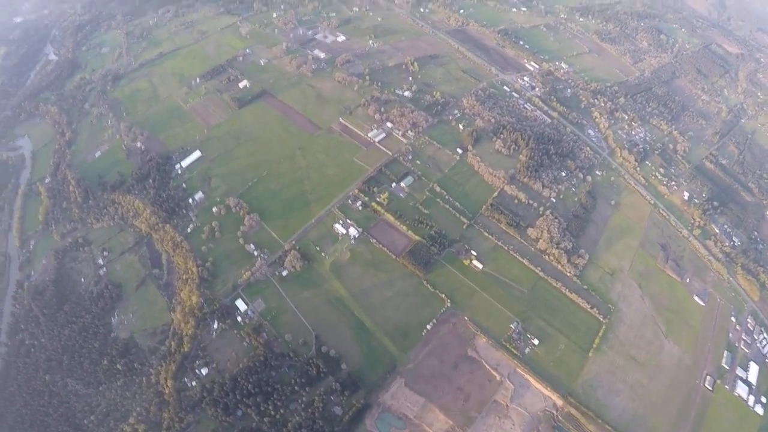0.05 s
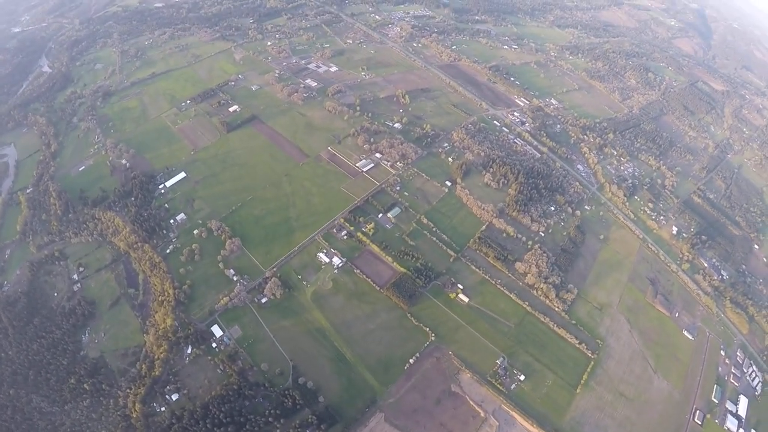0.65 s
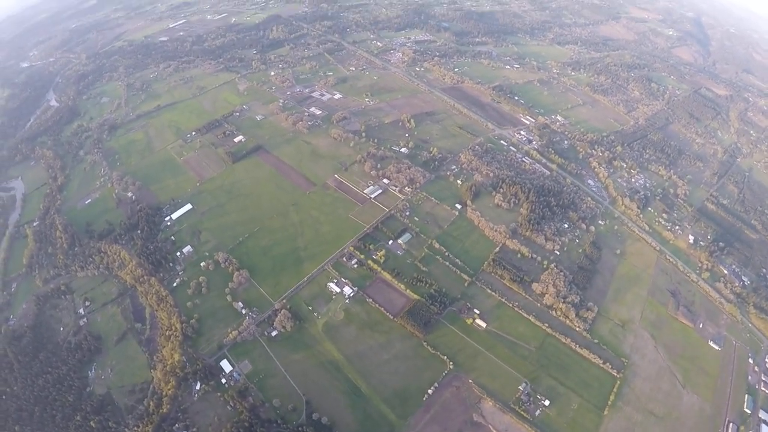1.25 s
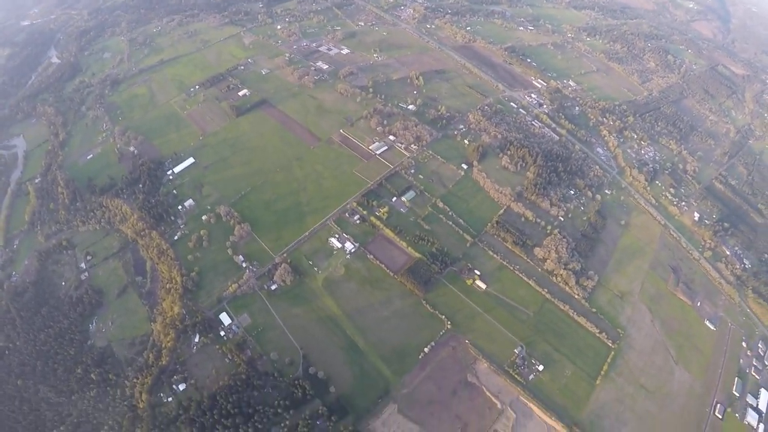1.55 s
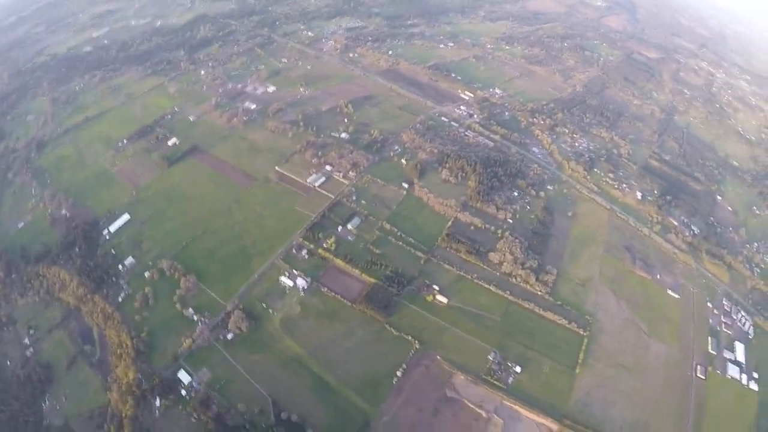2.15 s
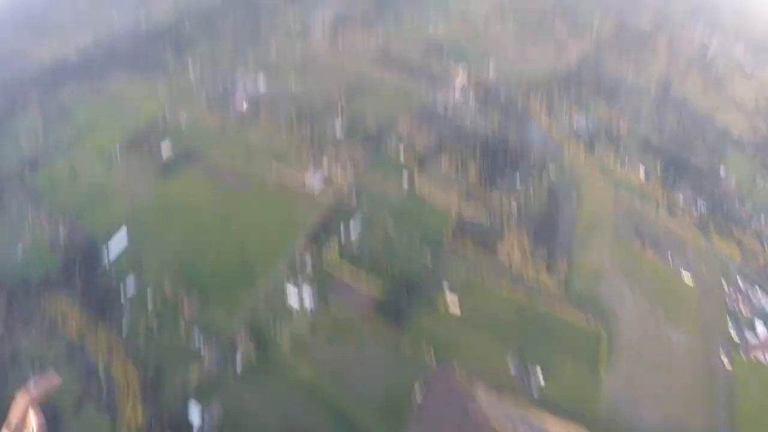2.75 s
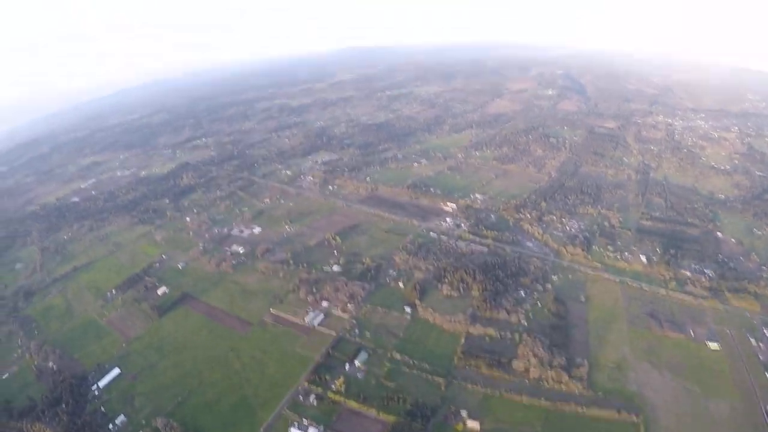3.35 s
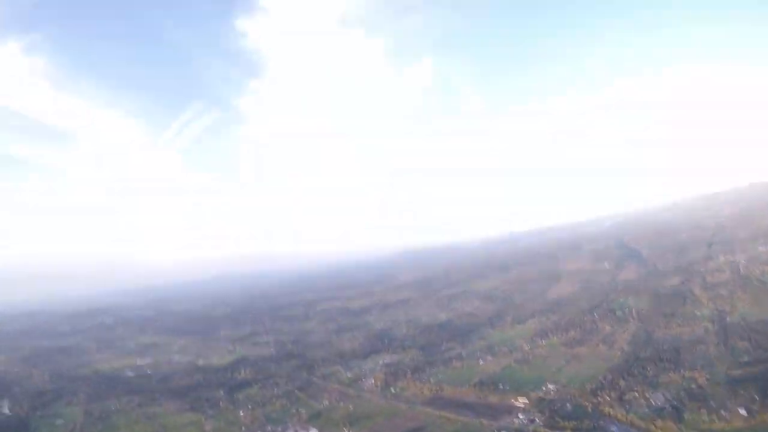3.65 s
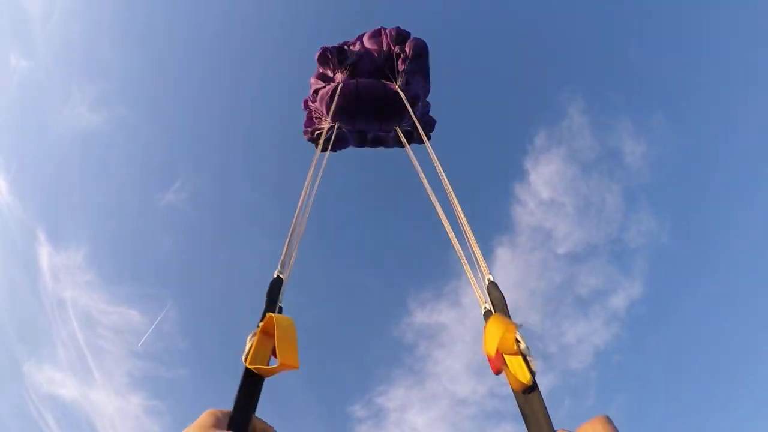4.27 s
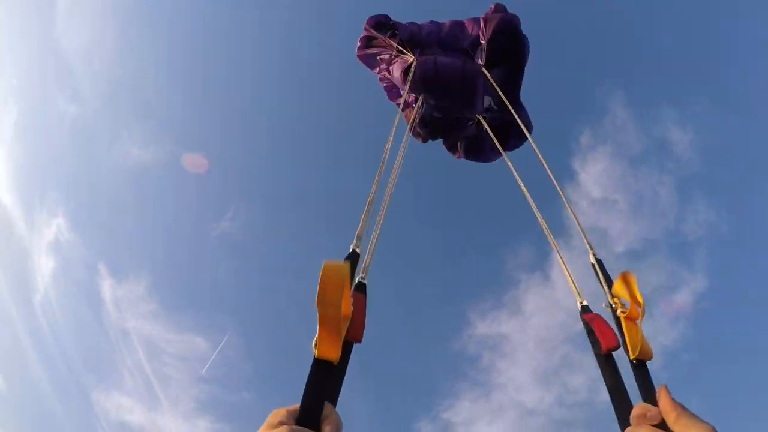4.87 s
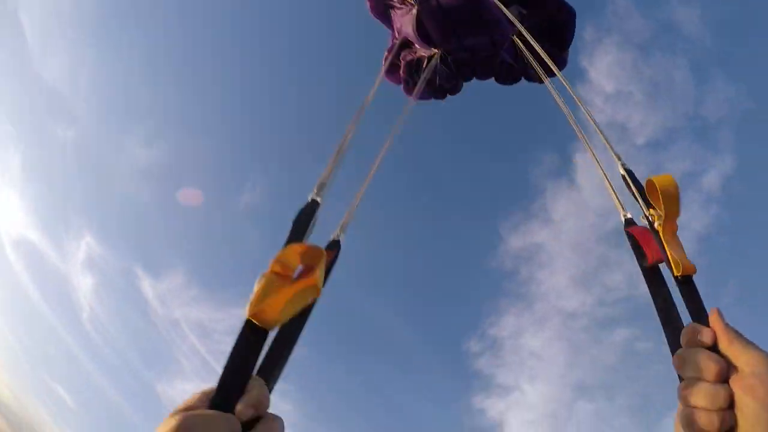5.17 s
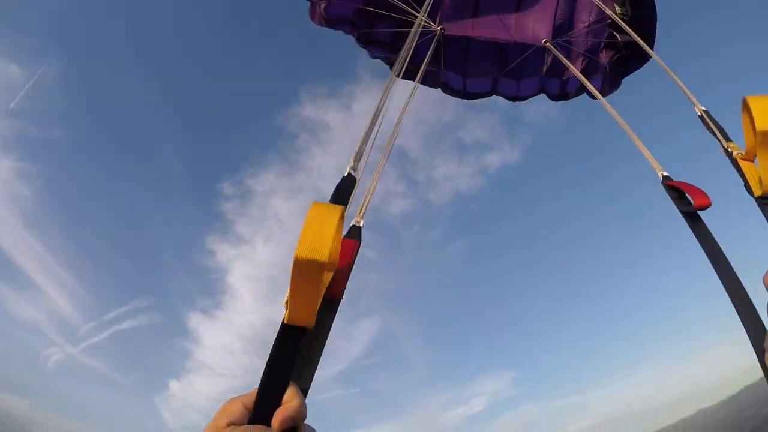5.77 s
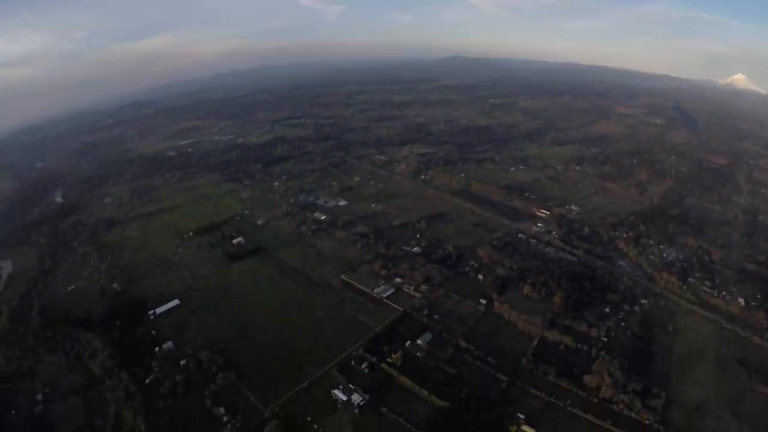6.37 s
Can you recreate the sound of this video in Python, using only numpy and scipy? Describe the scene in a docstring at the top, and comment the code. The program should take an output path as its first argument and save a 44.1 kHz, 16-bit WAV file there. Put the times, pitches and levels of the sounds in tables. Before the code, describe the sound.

Loud wind rushes over a skydiver's helmet microphone in freefall, a deep rumble with a tearing roar, steady hiss and occasional thuds. About halfway through, the parachute starts to open: the hiss drops and the wind breaks into rapid buffets with small, sharp snaps of nylon. These thin out as the fall slows, leaving a softer rumble, a light hiss and a faint swish of fabric sliding down the lines.

```python
"""Freefall wind on a skydiver's helmet microphone: large eddies rumble, smaller ones roar and tear,
the airstream hisses over the case and single vortices thud on the port. At 3.5 s the opening parachute
swings the jumper upright: the hiss drops and the flow breaks into buffets and snaps of nylon. These thin
out as the fall slows, leaving a soft rumble, a light hiss and the slider swishing down the lines."""
import sys
import numpy as np
from scipy import signal
from scipy.fft import rfft, irfft, next_fast_len
from scipy.io import wavfile
from scipy.ndimage import uniform_filter1d, minimum_filter1d

SR = 44100
rng = np.random.default_rng(int(sys.argv[2]) if len(sys.argv) > 2 else 0)


def transcribe(u):
    """Save the signal u as a 16-bit wav file named by the first command-line argument.

    u: samples, shape (n,) or (channels, n), limited to [-1, 1]; the rate is SR.
    q: integer samples, one column per channel.
    """
    v = np.clip(np.atleast_2d(u).T, -1, 1)
    q = np.round(v * 32767).astype(np.int16)
    wavfile.write(sys.argv[1], SR, q)


N = 287525
TIME_S = np.arange(N) / SR

# airspeed: (time [s], share of freefall speed [0-1])
AIRSPEED = [(0, 1), (3.53, 0.99), (3.6, 0.97), (3.85, 0.86), (4.25, 0.49), (4.76, 0.34), (5.15, 0.16),
            (6.5, 0.31)]
# turbulence at the port: (time [s], level [dB])
GUSTS = [(0, 7), (.2, -1), (.45, 5), (1.33, 5), (1.44, -4), (1.7, 3.5), (2.02, 5), (2.24, -5), (2.76, -4.5),
         (3.12, 2), (3.42, -3), (3.75, -5.5), (4.24, -13), (4.7, -10.5), (5.2, -2), (5.42, -7), (6.1, 0),
         (6.25, -19), (6.38, -13)]
# head turns: (centre [s], duration [s], hiss change [dB], rumble change [dB])
TURNS = [(.7, 0.41, 1.5, 2), (1.23, 0.055, -3.5, 3), (1.55, 0.22, 1, 1), (1.9, .12, 0.5, -1),
         (2.033, 0.073, -2, 0.5), (3.28, 0.55, -3.5, -0.5), (3.554, 0.026, -8, 1), (4.7, .4, -1, -0.5),
         (6.305, 0.072, 4.5, -0.5)]
# brief slackening of the flow: (centre [s], half length [s], depth [dB])
FLOW_LULLS = [(1.438, 0.02, 5), (1.481, 0.0093, 7.5), (1.537, 0.018, 5.5), (1.76, 0.02, 2), (2.54, 0.01, 5),
              (3.455, 0.017, 1.5), (3.617, 0.018, 9.5), (3.965, 0.0082, 13), (4.043, 0.01, 4),
              (4.39, 0.012, 8), (4.802, .016, 2), (4.974, 0.019, 5), (5.037, 0.011, 3), (5.203, 0.02, 5.5),
              (5.455, 0.011, 5), (5.59, 0.023, 2), (5.717, 0.011, 3.5), (5.939, 0.022, 6.5),
              (6.027, 0.045, 6.5), (6.222, 0.02, 10), (6.27, 0.018, 1)]
# vortices hitting the port: (time [s], length [s], thud [dB], slap [dB], crack [dB], thump [dB])
VORTEX_HITS = [(1.055, 0.0087, -13, -12, -24, -16), (1.274, 0.019, -17.5, -6, -36, -7),
               (1.517, 0.0057, -13, -15, -40, -10), (1.586, .0083, -12, -17, -36, -20),
               (1.673, 0.012, -24, -14, -32, -19), (1.72, 0.0088, -5, -6.5, -25, -16),
               (2.116, .01, -13, -12, -40, -11), (2.418, 0.013, -12.5, -14, -35, -10.5),
               (2.487, 0.0057, -13, -22, -42, -5.5), (2.522, .01, -7, -22, -33, -6),
               (2.643, 0.014, -11, -15, -40, -10.5), (2.878, 0.023, -16, -14.5, -26, -17),
               (2.915, .009, -12, -10.5, -20, -14), (3.025, 0.0075, -10.5, -24, -28, -20),
               (3.336, 0.011, -12, -7.5, -27, -5), (3.534, 0.03, -17.5, -14.5, -29, -9.5),
               (3.62, 0.0054, -8.5, -12, -38, -8.5), (3.662, 0.0092, -5.5, -16, -28.5, -12),
               (3.817, 0.0043, -20, -27, -26, -28), (3.838, 0.0075, -14, -13.5, -29, -9),
               (3.905, 0.0041, -21, -31, -29, -11), (3.924, 0.011, -14, -20, -29, -6.5),
               (3.99, 0.017, -22, -24.5, -34.5, -6.5), (4.051, 0.0079, -15, -26, -42, -7),
               (4.146, 0.019, -6, -8.5, -27.5, -5), (4.178, 0.0085, -9, -21, -33.5, -20),
               (4.217, 0.014, -28, -26, -41, -11), (4.249, 0.011, -31, -31, -44, -6),
               (4.286, 0.0088, -6, -4.5, -21, -6.5), (4.341, 0.013, -18.5, -14, -31.5, -6),
               (4.368, 0.012, -16, -22, -35, -19), (4.423, .016, -14.5, -15.5, -32.5, -6),
               (4.453, .015, -18, -28, -36, -17), (4.484, 0.012, -30, -36, -53, -27),
               (4.559, 0.017, -9.5, -15.5, -28.5, -5.5), (4.616, 0.0098, -17, -17.5, -43, -7.5),
               (4.655, 0.0086, -12, -19, -35.5, -18), (4.715, 0.02, -5, -10, -24.5, -4),
               (4.746, 0.007, -9, -18, -27, -7), (4.769, 0.017, -17, -18, -30.5, -8),
               (4.792, .0088, -24, -30, -41, -20), (4.819, 0.0072, -27, -28, -46, -16),
               (4.854, 0.012, -9, -19, -35, -10), (4.885, 0.0085, -25, -25, -54.5, -12),
               (4.919, 0.02, -27, -30.5, -55, -36), (4.989, 0.019, -13.5, -20.5, -34.5, -9),
               (5.073, 0.011, -15, -24.5, -44, -11), (5.143, 0.014, -23, -28, -39, -25),
               (5.234, 0.013, -27, -32, -44, -21), (5.331, 0.006, -7.5, -16, -37, -6),
               (5.399, 0.041, -24.5, -36.5, -59, -14), (5.484, 0.014, -13, -29.5, -45, -5.5),
               (5.543, 0.018, -19.5, -29, -50, -19), (5.62, 0.023, -24, -40, -57, -31),
               (5.745, 0.011, -29, -38, -62, -13.5), (5.861, 0.032, -22, -42, -61, -19),
               (6.119, 0.017, -18, -32, -55, -14), (6.33, .025, -14, -28, -43, -8),
               (6.376, 0.05, -22, -32.5, -60, -13)]
# taut nylon snapping: (time [s], level [dB])
NYLON_SNAPS = [(3.58, -28), (3.619, -45), (3.6563, -20.5), (3.8394, -34), (3.902, -42), (3.9188, -24),
               (4.074, -32), (4.1105, -36), (4.137, -33), (4.1476, -21), (4.1815, -37), (4.2432, -45),
               (4.2771, -42), (4.287, -30), (4.335, -35), (4.419, -29.5), (4.549, -41), (4.558, -26),
               (4.5914, -33), (4.617, -36), (4.6511, -42), (4.6941, -36), (4.705, -35), (4.71, -25),
               (4.718, -39), (4.726, -35), (4.746, -37), (4.7634, -41), (4.7705, -35), (4.857, -31.5),
               (4.981, -39), (4.9912, -36), (5.332, -39), (5.481, -43), (6.326, -44)]
# slider slipping down the lines: (centre [s], half length [s], level [dB])
SLIDER_SLIPS = [(5.855, 0.29, -49), (5.85, 0.055, -57), (5.897, 0.014, -42.5), (6.078, 0.017, -41),
                (6.177, 0.034, -50.5), (6.257, 0.052, -59.5), (6.37, 0.069, -46.5), (6.5, .05, -63.5)]

# large, middling and small eddies: (frequency [Hz], relative density [dB])
RUMBLE_SPECTRUM = [(10, -56), (22, -9), (45, -1), (70, -3), (110, -6.5), (150, -11), (260, -33),
                   (600, -78.5)]
ROAR_SPECTRUM = [(70, -8.5), (140, -1), (220, 0.5), (350, -1.5), (510, -4.5), (700, -12), (1000, -47.5),
                 (1600, -37), (4000, -102)]
TEARING_SPECTRUM = [(400, -3.5), (780, 7.5), (1100, 1), (1500, -8), (2100, -12), (3100, -15.5),
                    (3700, -17.5), (5600, -33), (8000, -40), (11000, -44), (13000, -43), (16000, -54)]
# hiss coloured by the case's cavities; dry wind rasp: (frequency [Hz], relative density [dB])
HISS_SPECTRUM = [(700, -6), (1500, -0.5), (2500, -1.5), (3100, 2), (3600, -3.5), (4000, 0), (5600, 0.5),
                 (6500, -6), (8000, -12), (9400, -13.5), (11200, -19), (12400, -13.5), (13300, -12),
                 (15500, -18)]
RASP_SPECTRUM = [(600, -21), (1200, 3.5), (1900, 1.5), (2500, -5), (3050, -0.5), (3700, -6), (7000, -55)]
# a buffet's deep body, slap and crack ringing in the port: (frequency [Hz], relative density [dB])
THUD_SPECTRUM = [(30, -19.5), (65, -8.5), (110, 0.5), (185, 1.5), (270, -4.5), (350, -10), (600, -54),
                 (2000, -115)]
SLAP_SPECTRUM = [(200, -26), (320, 0.5), (420, 1), (560, -2), (700, -8.5), (1000, -20), (1600, -45),
                 (4000, -97)]
CRACK_SPECTRUM = [(350, -25), (720, 7.5), (1200, 5), (1550, 1), (1950, 0), (2400, -6), (3100, -5),
                  (3900, -15), (5600, -16.5), (8000, -30), (11000, -41), (13000, -41), (16000, -47)]
# snapping and sliding nylon: (frequency [Hz], relative density [dB])
SNAP_SPECTRUM = [(700, -20), (1400, 15), (2400, -11), (3100, -2), (3900, 0), (5600, -2.5), (8000, -16),
                 (11000, -20), (13000, -22), (15500, -26)]
SLIDE_SPECTRUM = [(900, 8.5), (1900, -14), (2400, -4), (3050, 5.5), (4300, -3.5), (5700, -0.5), (6500, -6),
                  (8000, -16.5), (11000, -22.5), (12800, -18), (15500, -30)]


def from_db(db):
    return 10 ** (np.asarray(db) / 20)


def unit_rms(x):
    return x / np.sqrt(np.mean(x ** 2) + 1e-20)


def curve(rows):
    return np.interp(TIME_S, *np.transpose(rows))


def noise(spectrum):
    """Coloured noise, rms 1."""
    hz, level_db = np.transpose(spectrum)
    size = next_fast_len(N)
    bins_hz = np.maximum(np.fft.rfftfreq(size, 1 / SR), 1)
    gain = from_db(np.interp(np.log(bins_hz), np.log(hz), level_db))
    return unit_rms(irfft(rfft(rng.standard_normal(size)) * gain, size)[:N])


def drift(rate_hz):
    """Smooth random curve, rms 1."""
    hop, settle_steps = 20, 2000
    pole = np.exp(-2 * np.pi * rate_hz * hop / SR)
    white = rng.standard_normal(N // hop + settle_steps + 2)
    slow = signal.lfilter([1], [1, -2 * pole, pole * pole], white)[settle_steps:]
    return np.interp(np.arange(N) / hop, np.arange(len(slow)), unit_rms(slow))


def bursts(rate_hz, fade_s, smoothing_hz=250):
    """Randomly timed pulses: fast swell, exponential fade."""
    hits = (rng.random(N) < rate_hz / SR) * rng.uniform(.4, 1, N)
    fading = signal.lfilter([1], [1, -np.exp(-1 / (fade_s * SR))], hits + 1e-18)
    return signal.sosfilt(signal.butter(2, smoothing_hz, fs=SR, output="sos"), fading)


def envelope(x, span_s):
    """Smooth running rms."""
    size = max(int(span_s * SR), 2)
    power = uniform_filter1d(uniform_filter1d(x ** 2, size), size)
    return np.sqrt(np.maximum(power, 1e-12))


def levelled(x, span_s):
    """Holds the slow level at 1, keeps the fast lumps."""
    return x / envelope(x, span_s)


def high_shelf(x, knee_hz, top_gain):
    low = signal.sosfiltfilt(signal.butter(2, knee_hz, fs=SR, output="sos"), x)
    return low + top_gain * (x - low)


def wind_gain(speed, freefall_db, exponent, gust_share):
    """Power law of airspeed, swelling with the gusts."""
    return from_db(freefall_db + gust_share * curve(GUSTS)) * speed ** exponent


def posture_db():
    """Head turns change how the air meets the case, shifting hiss and rumble."""
    hiss_db = rumble_db = 0
    for centre_s, duration_s, hiss_change_db, rumble_change_db in TURNS:
        turned = np.clip((TIME_S - centre_s) / duration_s + .5, 0, 1)
        hiss_db += hiss_change_db * turned
        rumble_db += rumble_change_db * turned
    return hiss_db, rumble_db


def eddies(speed):
    """Three sizes of turbulence; small eddies break off the larger ones in bursts."""
    lumps = drift(rate_hz=43)
    shedding = bursts(rate_hz=20, fade_s=0.0012)
    rumble = high_shelf(noise(RUMBLE_SPECTRUM), knee_hz=58.3, top_gain=speed ** 0.84)
    rumble *= from_db(1.73 * lumps + 1.1 * shedding)
    roar = high_shelf(noise(ROAR_SPECTRUM), knee_hz=174, top_gain=speed ** 0.46)
    roar *= from_db(0.91 * lumps + 1.6 * shedding)
    tearing = noise(TEARING_SPECTRUM) * envelope(roar, span_s=0.0013) ** .5 * from_db(13 * shedding)
    return rumble, roar, tearing


def airstream(speed, turn_db):
    """Unbroken wind on the port; slower air is quieter and comes in puffs."""
    rumble, roar, tearing = eddies(speed)
    hollow_db = 2 * drift(rate_hz=13.3)
    roar = high_shelf(roar, knee_hz=290, top_gain=from_db(hollow_db))
    puff_db = 0.5 * (1.5 - speed) * drift(rate_hz=1.4)
    rumble = levelled(rumble, span_s=0.14) * from_db(turn_db)
    rumble *= wind_gain(speed, freefall_db=-17.5, exponent=0.51, gust_share=0.041)
    roar = levelled(roar, span_s=0.13)
    roar *= wind_gain(speed, freefall_db=-14, exponent=1.35, gust_share=0.23)
    tearing = levelled(tearing, span_s=0.069)
    tearing *= wind_gain(speed, freefall_db=-27, exponent=1.51, gust_share=0.7)
    return from_db(puff_db) * (rumble + roar + tearing)


def case_hiss(speed, turn_db):
    """Fine turbulence along the case: smooth at full speed, duller and fluttering in slow air."""
    flutter_db = (0.4 + 2 * np.sqrt(1 - speed)) * drift(rate_hz=18)
    hiss = high_shelf(noise(HISS_SPECTRUM), knee_hz=7650, top_gain=speed ** 0.68)
    gain = wind_gain(speed, freefall_db=-31, exponent=0.96, gust_share=0.065)
    return gain * from_db(turn_db + flutter_db) * hiss


def rasp(level_db=-27.5, hold_s=0.046, fade_db_per_s=28):
    """Dry, flickering edge on the wind at the start."""
    fade_db = fade_db_per_s * np.maximum(TIME_S - hold_s, 0)
    flicker_db = 1.7 * drift(rate_hz=100)
    return from_db(level_db - fade_db + flicker_db) * noise(RASP_SPECTRUM)


def buffets():
    """Each vortex sucks, then pushes on the membrane, with a thud, a slap and a crackling core."""
    thud = levelled(noise(THUD_SPECTRUM), span_s=0.0085)
    slap = levelled(noise(SLAP_SPECTRUM), span_s=0.0075)
    grain = envelope(thud + slap, span_s=0.0012) * from_db(3.7 * drift(rate_hz=480))
    crack = levelled(noise(CRACK_SPECTRUM) * grain, span_s=0.011)
    out = np.zeros(N)
    for time_s, length_s, thud_db, slap_db, crack_db, thump_db in VORTEX_HITS:
        near = np.abs(TIME_S - time_s) < 4 * length_s
        offset_s = TIME_S[near] - time_s
        core = np.exp(-2.1 * (offset_s / length_s) ** 2)
        skirt = 0.039 * np.exp(-np.abs(offset_s / length_s))
        swing = offset_s / (0.0012 + 0.2 * length_s)
        thump = swing * np.exp((1 - swing ** 2) / 2)
        blast = (from_db(thud_db) * thud[near] + from_db(slap_db) * slap[near]
                 + from_db(crack_db) * crack[near])
        out[near] += (core + skirt) * blast + from_db(thump_db) * thump
    return out


def gaussian(centre_s, half_length_s):
    return np.exp(-((TIME_S - centre_s) / half_length_s) ** 2)


def lulls_db():
    """The flow slackens briefly and returns."""
    return -sum(depth_db * gaussian(centre_s, half_s) for centre_s, half_s, depth_db in FLOW_LULLS)


def cloth_flutter(level_db=-36, opening_s=3.1, filled_s=4.91, rise_db_per_s=400, fade_db_per_s=58):
    """Small flicks of slack nylon, from the opening until the canopy fills."""
    rise_db = rise_db_per_s * np.minimum(TIME_S - opening_s, 0)
    fade_db = fade_db_per_s * np.maximum(TIME_S - filled_s, 0)
    flicks = bursts(rate_hz=20, fade_s=0.0036) * noise(CRACK_SPECTRUM)
    return from_db(level_db + rise_db - fade_db) * flicks


def snaps(attack_s=0.0003, fade_s=0.0014):
    """Bright ticks of taut nylon as the canopy flogs."""
    gain = np.zeros(N)
    for time_s, level_db in NYLON_SNAPS:
        near = np.abs(TIME_S - time_s) < 10 * fade_s
        offset_s = TIME_S[near] - time_s
        gain[near] += from_db(level_db) * np.exp(np.minimum(offset_s / attack_s, -offset_s / fade_s))
    return gain * levelled(noise(SNAP_SPECTRUM), span_s=0.0015)


def slider():
    """The slider rubs unevenly down the lines: one long slide, a few quick slips."""
    slips = sum(from_db(db) * gaussian(centre_s, half_s) for centre_s, half_s, db in SLIDER_SLIPS)
    roughness_db = 2 * drift(rate_hz=120)
    return slips * from_db(roughness_db) * noise(SLIDE_SPECTRUM)


def scene():
    """Wind and cloth at one microphone."""
    speed = curve(AIRSPEED)
    hiss_turn_db, rumble_turn_db = posture_db()
    lull_db = lulls_db()
    stream = from_db(lull_db) * airstream(speed, rumble_turn_db)
    hiss = from_db(0.21 * lull_db) * case_hiss(speed, hiss_turn_db)
    wind = stream + hiss + rasp() + buffets()
    cloth = slider() + from_db(lull_db) * cloth_flutter() + snaps()
    return (wind + cloth)[None, :]


def record(dry, ceiling=.95, release_db_per_s=54, cutoff_hz=15400):
    """Slow-release peak limiter, so hard buffets duck the hiss; then a steep low-pass."""
    over_db = 20 * np.log10(np.maximum(np.abs(dry) / ceiling, 1))
    recovery_db = release_db_per_s * TIME_S
    duck_db = np.maximum.accumulate(over_db + recovery_db, axis=-1) - recovery_db
    gain = uniform_filter1d(minimum_filter1d(from_db(-duck_db), size=89), size=89)  # 2 ms look-ahead
    lowpass = signal.ellip(12, .1, 90, cutoff_hz, fs=SR, output="sos")
    return signal.sosfilt(lowpass, dry * gain)


dry = scene()
out = record(dry)
transcribe(out)
```